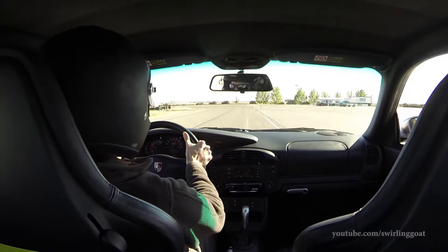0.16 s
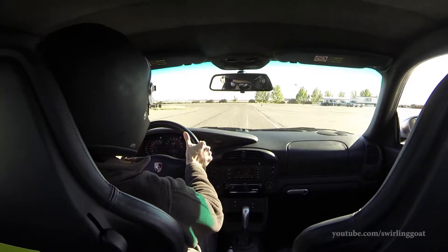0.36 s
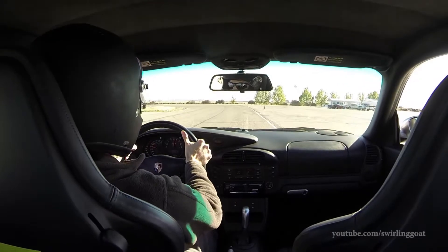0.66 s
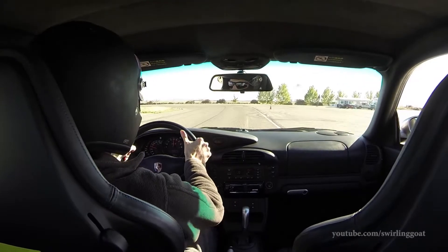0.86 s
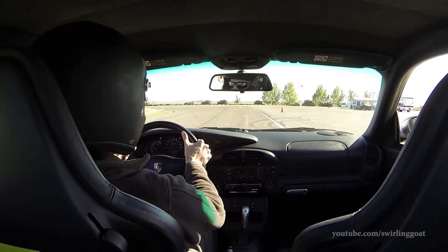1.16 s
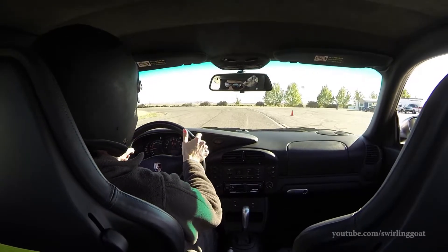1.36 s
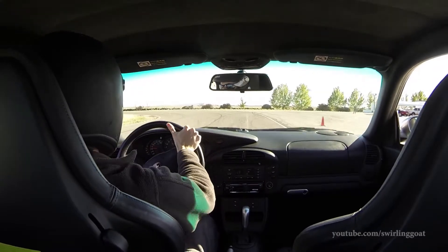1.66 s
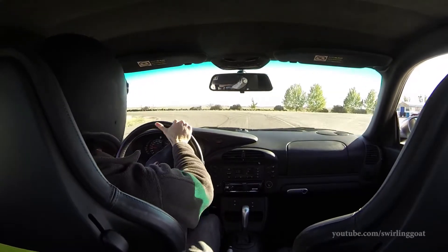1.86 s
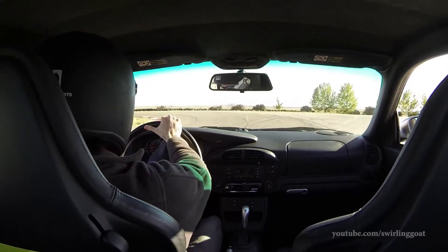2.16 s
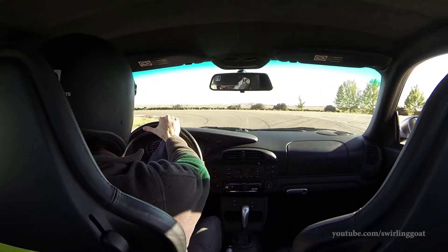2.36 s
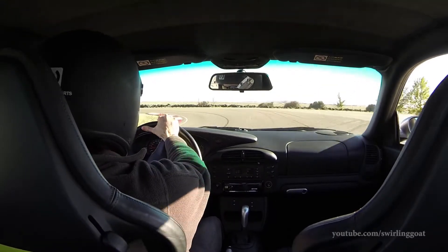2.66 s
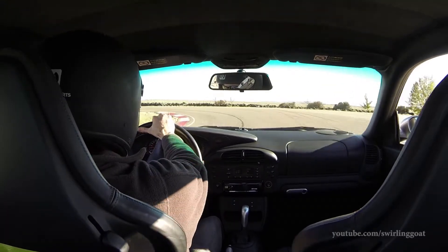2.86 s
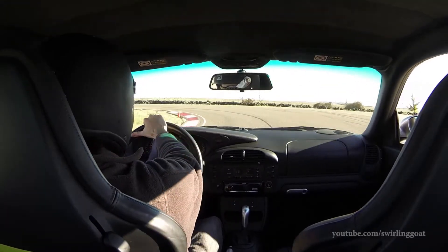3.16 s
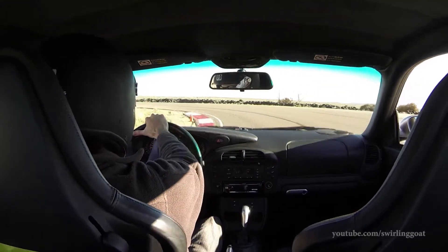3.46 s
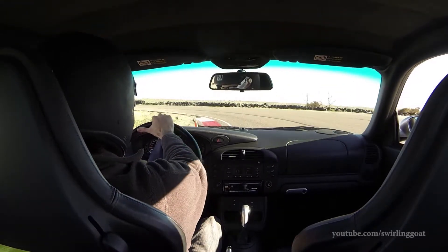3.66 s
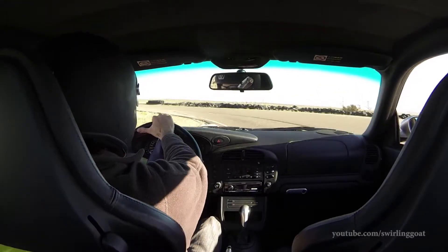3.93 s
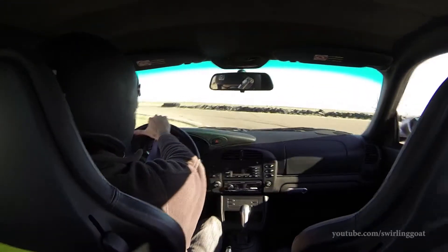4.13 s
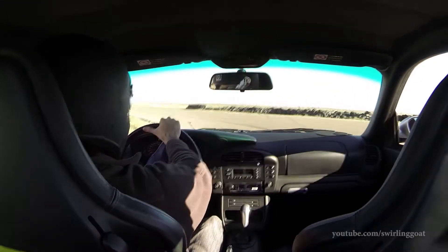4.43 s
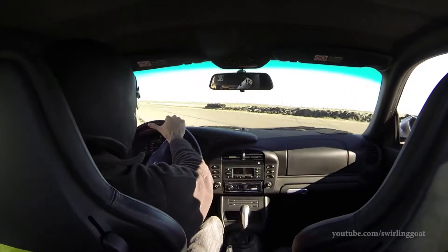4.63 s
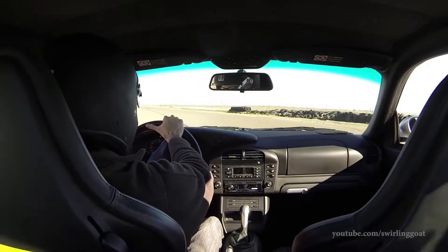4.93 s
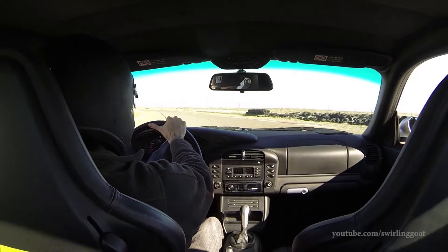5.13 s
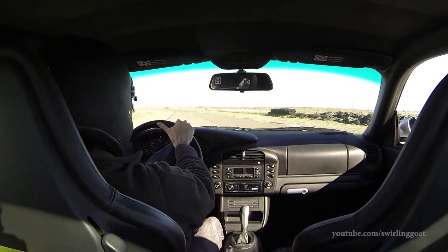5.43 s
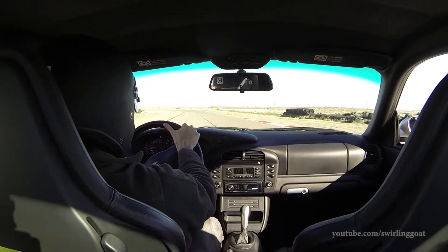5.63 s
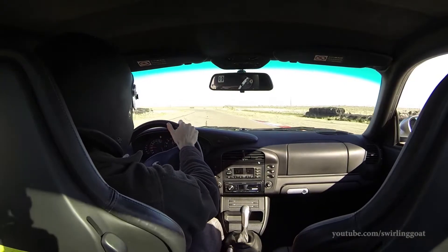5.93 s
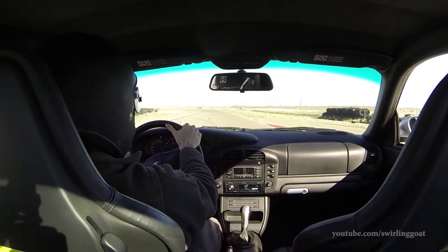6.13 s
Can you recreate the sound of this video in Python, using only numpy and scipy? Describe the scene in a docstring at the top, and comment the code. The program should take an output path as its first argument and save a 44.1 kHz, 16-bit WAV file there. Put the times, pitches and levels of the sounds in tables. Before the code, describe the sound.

A sports car engine heard from inside slows, holds through a corner, then pulls hard over road rumble and microphone crackle.

```python
"""Inside a car, a six-cylinder engine slows under braking, holds through a corner, then pulls hard.
Its tones swell as they cross pitches at which the cabin rings. Under it the road rumbles, the wind
roars and the tyres scrub. Bumps make the cabin boom, ridges jolt the floor and loose trim clinks.
A small overloaded microphone crackles, the level dips after loud crackles, and the deep bass is cut."""
import sys
import numpy as np
from scipy import signal
from scipy.fft import rfft, irfft, next_fast_len
from scipy.io import wavfile
from scipy.ndimage import uniform_filter1d, map_coordinates

SR = 44100
rng = np.random.default_rng(int(sys.argv[2]) if len(sys.argv) > 2 else 0)


def generate_wav(sig):
    """Save sig (samples, or channels by samples) to the path in sys.argv[1] as 16-bit PCM at SR."""
    pcm = np.round(np.clip(np.atleast_2d(sig).T, -1, 1) * 32767).astype(np.int16)
    wavfile.write(sys.argv[1], SR, pcm)


N = 277389
STEP = 64  # samples between the points of a slow curve
SLOW_S = np.arange(0, N + STEP, STEP) / SR


def amp(db):
    """Turn decibels into a gain."""
    return 10 ** (np.asarray(db) / 20)


def unit(x):
    """Scale x to an average (rms) level of 1."""
    return x / np.sqrt(np.mean(x ** 2) + 1e-20)


def curves(rows):
    """One slow curve for each column after the time."""
    times, *columns = np.transpose(rows)
    return [np.interp(SLOW_S, times, column) for column in columns]


def wobble(rate):
    """A slow curve gliding through `rate` random values a second."""
    return map_coordinates(rng.standard_normal(int(N * rate / SR) + 4), [SLOW_S * rate])


def smooth(x):
    """Fill in a slow curve to one value a sample."""
    return np.interp(np.arange(N) / STEP, np.arange(len(x)), x)


def filtered(x, response):
    """Scale each frequency in x by response(hz)."""
    size = next_fast_len(N + SR // 2)
    return irfft(rfft(x, size) * response(np.fft.rfftfreq(size, 1 / SR)), size)[..., :N]


def noise(spectrum):
    """Noise of level 1, shaped by rows of pitch_hz, level_db."""
    pitches, levels = np.transpose(spectrum)
    gain = lambda hz: amp(np.interp(np.log(hz + 1), np.log(pitches + 1), levels))
    return unit(filtered(rng.standard_normal(N), gain))


# When the tyres scrub: middle_s, length_s, level_db
SCRUBS = [(.8, 1.101, -46)]
# The tone of the scrub: pitch_hz, level_db
SCRUB_TONE = [(800, -120), (960, -7.5), (1060, 3), (1130, -7.5), (1200, -4.5), (1300, -11.5), (1500, -120)]

def tyre_scrub():
    """Tyres make a narrow, fluttering hiss while the brakes bite."""
    swell = sum(amp(db) * np.exp(-(2 * (SLOW_S - s) / length) ** 2) for s, length, db in SCRUBS)
    return smooth(swell * amp(2.5 * wobble(11))) * noise(SCRUB_TONE)


# Low hums: middle_s, length_s, pitch_hz, fall_hz_per_s, level_db
HUMS = [(1.68, 0.5, 180.5, 32, -28.5), (4.48, 0.56, 140.7, 15, -28.5)]

def hum():
    """Wavering tones from the tyres or drive line swell and sink in pitch."""
    sound = np.zeros(N)
    for s, length, hz, fall, db in HUMS:
        t = np.arange(N) / SR - s
        swell = amp(db) * np.exp(-(2 * t / length) ** 4)
        sound += swell * np.sin(2 * np.pi * (hz - fall * t / 2) * t)
    return sound * np.sqrt(2) * smooth(amp(1.3 * wobble(6.6)))


# Knocks on loose trim: start_s, level_db, pitch_hz
CLINKS = [(.227, -47, 5000), (.326, -43.5, 4800), (1.304, -40, 2230), (2.139, -34, 3410),
          (2.748, -44, 2330), (3.198, -40, 2348), (3.535, -49, 2200), (3.64, -48, 2300), (4.428, -35, 2500),
          (4.55, -42, 2070), (4.73, -35, 2210)]

def trim_clinks(ring_s=0.016):
    """Each knock makes the plastic trim ring briefly at one pitch."""
    sound, t = np.zeros(N + SR), np.arange(SR // 20) / SR
    attack = 1 - np.exp(-t / 0.00097)
    for s, db, hz in CLINKS:
        sound[round(s * SR):][:len(t)] += amp(db - 60 * t / ring_s) * attack * np.sin(2 * np.pi * hz * t)
    return sound[:N]


# How strong the faint ticks are: time_s, level_db
TICK_LEVELS = [(0, 3.5), (3.3, -0.5), (3.5, -1.5), (4.6, 5.5), (4.8, 0.5), (6.29, -12.5)]

def faint_ticks(level_db, spread_db, count, width):
    """The loudness outline of random ticks, each `width` samples long, swelling in clumps."""
    ticks = np.zeros(N)
    when, strength = rng.random((count, 2)).T
    np.add.at(ticks, (when * N).astype(int), amp(level_db + spread_db * strength ** 2))
    clumps = smooth(amp(curves(TICK_LEVELS)[0] + 3 * wobble(9)))
    return np.convolve(ticks * clumps, np.hanning(width), "same")


def ringing(x, depth_db):
    """Lift and sink narrow bands at random, so each crackle has its own pitches."""
    bands = signal.stft(x, nperseg=256)[2]
    lift = uniform_filter1d(rng.standard_normal(bands.shape), size=3, axis=0)
    lift = uniform_filter1d(lift, size=4, axis=1)
    return unit(signal.istft(bands * amp(depth_db * unit(lift)), nperseg=256)[1][:N])


# Microphone overloads: middle_s, level_db, extra_dull_db, length_s
CRACKLES = [(0.013, -40, 11, 0.0041), (0.052, -54, 18, 0.0015), (0.077, -53, 9, 0.0026),
            (0.12, -55, 6, 0.0012), (0.359, -54, -3, .0015), (0.088, -59, -15, 0.036),
            (0.229, -40.5, 8.5, 0.0018), (0.2366, -43, -3, 0.0014), (0.327, -41.5, 5, 0.0041),
            (0.3366, -53, 6.5, 0.0064), (0.379, -48, 1, 0.0056), (.4266, -51, -12, 0.0017),
            (0.467, -43, -4, 0.0011), (0.498, -40.5, -5, 0.00086), (0.539, -53.5, -5, 0.0012),
            (0.634, -42, 4, 0.0063), (0.7286, -43, 5, 0.0019), (0.737, -52, 9, 0.0038),
            (0.924, -47.5, -2, 0.0022), (1.006, -43.5, 8, 0.0057), (1.1474, -43.5, 3, 0.0028),
            (1.156, -47, -4, 0.0036), (1.091, -51, 4, .0015), (1.189, -55, 5.5, 0.0013),
            (1.3074, -39.5, -1, 0.0054), (1.342, -51, -2, 0.0012), (1.522, -51, -4.5, .0015),
            (1.553, -50, -4, 0.0018), (1.636, -46.5, 0, .002), (1.859, -49, 3, 0.0011),
            (1.4936, -40.5, -7, 0.0022), (1.651, -45.5, 13.5, 0.0063), (1.66, -50.5, -5, 0.0024),
            (1.736, -39, 1.5, 0.0041), (1.804, -43, -6, 0.0018), (1.872, -45.5, 11.5, 0.0045),
            (1.997, -49, -5, 0.0027), (2.1422, -39.5, 6, 0.0017), (2.148, -52.5, 12, 0.0061),
            (2.338, -51.5, 7, 0.0045), (2.475, -49, -5.5, 0.002), (2.499, -51, 4, .0015),
            (2.81, -49, 1, .0015), (3.006, -51, -2, .0015), (3.441, -47.5, -1, .0015),
            (2.418, -44.5, 11, 0.0025), (2.479, -40.5, 10, 0.0015), (2.6435, -42, 9.5, 0.0015),
            (2.7496, -40, 5, 0.0037), (2.912, -47.5, 15, .0035), (2.9375, -45, -9, .0012),
            (2.961, -46, -17, 0.002), (2.966, -46.5, 4, 0.0017), (3.199, -37, -2, .0035),
            (3.206, -42, 7, 0.0043), (3.3645, -45.5, -13, 0.0015), (3.478, -50.5, -1, 0.0077),
            (3.5306, -43.5, 7, 0.0064), (3.5384, -37.5, 1, 0.0041), (3.546, -48.5, 14, 0.0025),
            (3.635, -47, 8, 0.005), (3.6448, -38, 0, 0.0024), (3.8097, -42, -4, 0.0032),
            (3.816, -43.5, 13, 0.0033), (3.904, -51, 18.5, 0.0047), (3.9112, -42, 14, 0.0012),
            (3.949, -48, 6, 0.0013), (3.9596, -48, 12, 0.0055), (4.07, -48.5, 18.5, 0.0019),
            (4.0912, -42, 0, 0.003), (4.099, -48.5, 7, 0.0049), (4.147, -44.5, 15.5, 0.0029),
            (4.152, -49, -6, .002), (4.221, -39, 12, 0.0011), (4.31, -68, 31.5, 0.0038),
            (4.3475, -57, 16, 0.012), (4.171, -57, 5, .0015), (4.375, -54, 3, 0.00099),
            (4.393, -43, 11, 0.0018), (4.461, -60, 5, 0.0014), (4.431, -48.5, 6, 0.011),
            (4.437, -58, -1, 0.0033), (4.486, -56, 19, 0.0035), (4.502, -49.5, 15.5, 0.0019),
            (4.5517, -51, 14.5, 0.006), (4.625, -49, 12, 0.004), (4.631, -46, -21, 0.0018),
            (4.791, -47.5, -0.5, 0.00148), (4.909, -46.5, -1, 0.0025), (4.815, -54, -3, .0013),
            (4.882, -54.5, -2, 0.0015), (4.993, -45.5, -3, 0.0023), (5.17, -47, -2.5, 0.0016),
            (5.211, -44, 8, 0.0019), (5.223, -39, 1, 0.0039), (5.313, -54, 7, .002),
            (5.323, -49, -2, 0.0043), (5.342, -57, -5, .0013), (5.398, -49.5, 0, 0.0047),
            (5.468, -46, -6, 0.00323), (5.491, -57, -7, .0013), (5.592, -49, -8.5, 0.002),
            (5.677, -57, -9, 0.0033), (5.6823, -42, 9, 0.0021), (5.715, -43, -7.5, 0.00076),
            (5.733, -50.5, -0.5, 0.0023), (5.742, -52.5, -2, .0013), (6.018, -47.5, -13, .003),
            (6.0273, -46, 3, 0.0095), (6.046, -47, -10, 0.0045), (6.0925, -47, -3, 0.0018),
            (6.146, -50, -12, 0.0074), (6.271, -42, -5, 0.0016)]
# The sharp, dull and thin parts of a crackle: pitch_hz, level_db
SHARP_TONE = [(1200, -63.5), (2200, 8), (3000, 1), (4000, -2), (5000, -4), (6500, -10), (8000, -13.5),
              (10000, -20), (12000, -24.5), (14000, -45.5), (15500, -41.5)]
DULL_TONE = [(300, -120), (500, -0.5), (1200, 3.5), (2000, -2.5), (3000, -18), (5000, -120)]
THIN_TONE = [(3500, -120), (5500, -7.5), (8000, -4), (11000, -5.5), (15000, -21)]

def microphone_crackles():
    """Each overload is a short burst of grit with three tiny ticks close by."""
    sharp, dull, thin = np.zeros((3, N + SR))
    t = np.arange(-SR // 40, SR // 40) / SR
    for s, db, dull_db, length in CRACKLES:
        thin_db = -31 + 13 * rng.random()
        burst = np.exp(-(2 * t / length) ** 4)
        ticks = sum(amp(-8 - 10 * softness) * np.exp(-((t - .04 * (when - .5)) / 0.00072) ** 2)
                    for when, softness in rng.random((3, 2)))
        start = round((s + t[0]) * SR)
        parts = (sharp, -2, burst + ticks), (dull, dull_db - 3.5, burst), (thin, thin_db, burst)
        for track, offset_db, shape in parts:
            shape = shape[max(-start, 0):]  # skip anything before time zero
            track[max(start, 0):][:len(shape)] += amp(db + offset_db) * shape
    sharp = sharp[:N] + faint_ticks(level_db=-67, spread_db=11.5, count=1000, width=61)
    dull = dull[:N] + faint_ticks(level_db=-53, spread_db=7.5, count=400, width=131)
    thin = thin[:N] + faint_ticks(level_db=-75.5, spread_db=10.5, count=300, width=41)
    grit = ringing(noise(SHARP_TONE), depth_db=2.5)
    return sharp * grit + dull * noise(DULL_TONE) + thin * noise(THIN_TONE)


# Sudden drops in level: start_s, depth_db, recovery_s
DIPS = [(.39, -4, 0.038), (1.5, -4, 0.05), (1.885, -4.5, 0.031), (2.15, -3.5, 0.07), (2.49, -2.5, 0.059),
        (2.99, -3.5, 0.062), (3.215, -5.5, 0.046), (3.55, -2, 0.13), (3.97, -9.5, 0.052),
        (4.23, -7.5, 0.077), (4.64, -3, 0.11), (4.81, -2.5, 0.022), (5.23, -2, 0.037), (6.035, -6.5, 0.02)]

def level_dips(loud_db=-52):
    """A gain that drops after each loud crackle and at the listed times, then creeps back."""
    def dip(start_s, depth_db, recovery_s):
        age = np.clip(SLOW_S - start_s, 0, None)
        return depth_db * (1 - np.exp(-age / 0.00061)) * np.exp(-age / recovery_s)

    after_crackles = [dip(s, -0.4 * max(db - loud_db, 0), 0.14) for s, db, _, _ in CRACKLES]
    return smooth(amp(np.min(after_crackles, axis=0) + sum(dip(*row) for row in DIPS)))


# The wheels cross ridges: start_s, level_db
RIDGES = [(3.529, -14.5), (3.63, -16.5), (3.795, -15), (3.946, -17), (4.084, -6), (4.134, -18),
          (4.213, -13), (4.343, -10), (4.391, -34), (4.424, -11.5), (4.469, -12), (4.543, -15),
          (4.619, -15.5), (4.816, -22.5)]

def ridge_jolts(pitch_hz=201.4):
    """Each ridge gives the floor one quick pull and push."""
    floor, turns = np.zeros(N + SR), np.arange(SR // 20) / SR * pitch_hz
    jolt = amp(-12.3 * turns) * np.sin(2 * np.pi * turns) * (1 - np.exp(-3 * turns))
    for s, db in RIDGES:
        floor[round(s * SR):][:len(jolt)] -= amp(db) * jolt
    return floor[:N]


# Bumps in the road: middle_s, level_db, length_s, pitch_hz
BUMPS = [(0.231, -16.5, 0.019, 125.5), (0.31, -16, 0.058, 113.3), (0.376, -12.5, 0.015, 127.7),
         (0.573, -11.5, 0.024, 116.3), (0.644, -10, 0.017, 119), (0.98, -14, 0.045, 114.1),
         (1.957, -15.5, 0.03, 112), (2.114, -15.5, 0.056, 121.2), (2.328, -12.5, 0.036, 113),
         (2.418, -14, 0.024, 111), (2.468, -14, 0.061, 119), (2.748, -17.5, 0.026, 123.2),
         (2.83, -14.5, 0.031, 112), (2.936, -15.5, 0.019, 111.3), (3.196, -11, 0.068, 107.1),
         (3.361, -17, 0.035, 118.6), (3.484, -13, 0.071, 121.7), (3.598, -13.5, 0.033, 110.7),
         (3.758, -18, 0.056, 116.3), (3.825, -13.5, 0.035, 111), (3.871, -10, 0.026, 114),
         (3.946, -9.5, 0.02, 113.3), (4.056, -16, 0.092, 104.9), (4.235, -10.5, 0.025, 116),
         (4.434, -12.5, 0.021, 119), (4.783, -12.5, 0.07, 111.1), (4.878, -12, 0.046, 110)]

def cabin_booms():
    """Bumps make the cabin boom; returns the sound and its slow loudness curve."""
    swell = sum(amp(db) * np.exp(-(2.18 * (SLOW_S - s) / length) ** 2) for s, db, length, _ in BUMPS)
    times, _, _, pitches = np.transpose(BUMPS)
    nearest = np.abs(SLOW_S[:, None] - times).argmin(axis=1)
    phase = 2 * np.pi * np.cumsum(smooth(pitches[nearest])) / SR
    return smooth(swell) * np.sin(phase + smooth(0.75 * wobble(4.5))), swell


# Where the trim panels ring: pitch_hz, width_hz, boost_db
PANELS = [(1890, 67, 3.5), (2150, 37, 4), (2670, 130, 4), (3660, 82, 10)]

def panel_gain(hz):
    """Panels boost sound near their own pitches."""
    return amp(sum(db / (1 + (2 * (hz - pitch) / width) ** 2) for pitch, width, db in PANELS))


# Road and wind levels: time_s, thud_db, rumble_db, roar_db
ROAD_LEVELS = [(0, -18.5, -25, -46), (.3, -37.5, -26.5, -40.5), (.8, -19, -25.5, -41),
               (1.3, -19, -25.5, -43.5), (1.7, -23.5, -28.5, -43.5), (2.1, -34.5, -27.5, -46),
               (2.5, -25, -27.5, -45.5), (3, -23.5, -28.5, -46), (3.5, -42, -28.5, -46),
               (3.7, -30, -31, -49), (4.1, -35, -28.5, -47.5), (4.5, -25, -25.5, -46.5),
               (4.7, -33, -27, -48), (4.87, -26.5, -27.5, -43.5), (5.17, -27.5, -24, -40),
               (5.8, -23, -27, -40), (6, -18.5, -26, -38.5), (6.29, -26.5, -30, -37.5)]
# The tones of the thud, rumble and roar: pitch_hz, level_db
THUD_TONE = [(80, -27), (92, 5), (105, 28.5), (125, 15), (150, 2), (190, -48.5), (300, -120)]
RUMBLE_TONE = [(76, -6.5), (130, -4), (146, -15), (178, -0.5), (205, -14), (253, -4.5), (300, -6.5),
               (335, -23.5), (371, -13), (408, -22), (487, -15), (535, -27), (750, -39.5), (980, -39),
               (1650, -120)]
ROAR_TONE = [(300, -120), (450, -2), (560, 1), (680, -1), (800, 0), (1050, -0.5), (1200, 1), (1410, -8),
             (1600, -1.5), (1760, -8.5), (2200, -11.5), (3050, -26), (3700, -31), (4200, -34),
             (6500, -44.5), (10000, -51.5), (14000, -79)]

def road_and_wind(engine_angle):
    """Tyres thud and rumble through the floor; wind and intake roar pulse with the engine."""
    thud_db, rumble_db, roar_db = curves(ROAD_LEVELS)
    roughness = wobble(24)
    boom, swell = cabin_booms()
    shaken = np.tanh(swell / amp(-18))  # nears 1 on a strong bump
    rattle = sum(np.exp(-((SLOW_S - s - .006) / 0.0089) ** 2) * (2 + db / 45) for s, db in RIDGES)
    thud = smooth(amp(thud_db - 3.5 + roughness)) * noise(THUD_TONE)
    rumble_db += 1.7 * shaken + 1.74 * roughness + 2.3 * wobble(50)
    rumble = smooth(amp(rumble_db)) * noise(RUMBLE_TONE)
    roar_db += 1.1 * shaken + 2.5 * rattle + 1.6 * roughness + 1.1 * wobble(70)
    pulse = 1 + 0.11 * np.sin(engine_angle) + 0.33 * np.sin(3 * engine_angle)
    roar = smooth(amp(roar_db)) * unit(pulse * filtered(noise(ROAR_TONE), panel_gain))
    return boom + thud + rumble + roar


# Where the cabin rings: pitch_hz, width_hz, level_db
CABIN_PEAKS = [(107.3, 6.63, 7.5), (126.34, 6, 5), (164, 6.5, -3.5), (252.94, 16, -1), (301.5, 15, 0.5),
               (381, 11, 5.5), (435, 11, 1), (490, 19, 1), (517, 14, -6.5), (541, 8.6, -10),
               (610, 12, -10.5), (612, 17, -8), (673.3, 13, -1.5), (737, 24, -7), (932, 36, -2),
               (1060, 45, -1), (1198, 19, 3.5), (1338, 21, -5), (1586, 47, -1.5), (1880, 22, -11.5)]

def cabin_gain(hz, base_db=-15):
    """How strongly the cabin answers a steady tone."""
    peaks = sum(amp(2 * db) / (1 + (2 * (hz - pitch) / width) ** 2) for pitch, width, db in CABIN_PEAKS)
    return np.sqrt(amp(2 * base_db) + peaks)


# Engine speed (every cylinder fires once a cycle): time_s, cycles_per_s
ENGINE_SPEED = [(0, 47.8), (.28, 46.2), (.48, 43.7), (.56, 42.2), (.72, 41.2), (.78, 40.2), (.9, 38.7),
                (1.13, 37), (1.2, 36.3), (1.35, 34.5), (1.56, 33.2), (1.7, 32.6), (1.95, 31.8),
                (2.24, 31.3), (2.45, 31.4), (2.6, 32), (2.69, 31.6), (3.14, 32.25), (3.3, 32.2),
                (3.47, 32.4), (3.59, 32.8), (4.19, 33.8), (4.94, 34.6), (5.39, 35.7), (5.84, 36.9),
                (6.29, 38.5)]
# How hard the engine works: time_s, throttle_db, load_db, whine_db
EFFORT = [(0, -34.5, -25, -49.5), (.4, -26, -4.5, -67), (.6, -35, -10, -53), (.85, -10, -5.5, -55.5),
          (1.08, -26, -11.5, -61.5), (1.22, -16, 2.5, -55.5), (1.4, -18, 4.5, -56), (1.62, -7, 4.5, -51),
          (1.9, -13.5, -4, -56.5), (2.3, -15, -4, -58.5), (2.55, -22.5, -11.5, -60),
          (2.62, -11, -13.5, -56.5), (2.9, -9, -10.5, -57.5), (3.2, -6.5, -12, -59),
          (3.3, -13.5, -7.5, -56), (3.52, -5, -4, -58), (3.62, -17.5, -7, -65.5), (4.2, -12.5, -9, -54.5),
          (4.72, -28, -15.5, -75.5), (4.9, -15, -1, -52.5), (5.0, -9.5, 1, -53.5), (5.1, 0, 0.5, -49.5),
          (5.6, -0.5, -4, -54.5), (5.95, 2, 0, -47.5), (6.07, 1, 1.5, -46), (6.29, 2.5, 2.5, -51)]
# Base levels of the low, middle and upper tones: shake_db, drone_db, snarl_db
BASE_LEVELS = [-35, -34.5, -43.5]
# Tones from uneven cylinders and pipes: multiple_of_cycle, level_db
ENGINE_TONES = [(3, 13.5), (4, 11), (5, 2.5), (6, 9.5), (7, -5.5), (8, 6.5), (9, 3), (10, 10.5), (11, -2.5),
                (12, 16), (13, 6.5), (14, 11), (15, 12.5), (16, 2.5), (17, 4.5), (18, 11), (19, -8),
                (20, 2), (21, -3.5), (22, -0.5), (23, -4.5), (24, 4), (25, -2.5), (26, 1.5), (27, 0),
                (28, -0.5), (29, -7), (30, 2.5), (31, -7), (32, -9.5), (33, -0.5), (34, -4.5), (35, -5),
                (36, 2.5), (38, 1.5), (39, -5), (40, 3), (41, -0.5), (42, 1.5), (43, -2), (44, 2),
                (45, -0.7), (46, 0.5), (47, -2), (48, 0), (49, -0.5), (50, 2), (52, 7), (54, 4.5)]
# Tones that sing off the throttle: multiple_of_cycle, level_db
COAST_TONES = [(24, 2), (27, -1), (28, 0), (30, 0.2), (33, -1.5), (36, -0.5), (39, -5.5), (42, -5),
               (48, -3)]
# How loud those coasting tones are: time_s, level_db
COAST_LEVELS = [(0, -59), (.3, -44.5), (.5, -59), (.65, -45), (.8, -46.5), (1, -51), (1.13, -48),
                (1.3, -57.5), (1.55, -45.5), (1.8, -57.5), (2.2, -60), (3.6, -70), (3.8, -51.5),
                (4.1, -65.5), (6.29, -83.5)]

def engine():
    """Firing cylinders make tones at multiples of the cycle; returns the sound and cycle angle."""
    cycle_hz, = curves(ENGINE_SPEED)
    coast_db, = curves(COAST_LEVELS)
    throttle_db, load_db, whine = curves(EFFORT)
    shake, drone, snarl = np.array([load_db, 0.53 * throttle_db, throttle_db]) + np.c_[BASE_LEVELS]
    angle = 2 * np.pi * np.cumsum(smooth(cycle_hz)) / SR

    def tone(multiple, level_db, drift_rad, drift_hz):
        size = np.sqrt(2) * amp(level_db) * cabin_gain(multiple * cycle_hz)
        phase = 2 * np.pi * rng.random() + drift_rad * wobble(drift_hz)
        return smooth(size) * np.sin(multiple * angle + smooth(phase))

    sound = np.zeros(N)
    # No two firings are alike, so level and timing waver.
    for multiple, db in ENGINE_TONES:
        drive_db = shake if multiple < 5 else drone if multiple < 10 else snarl if multiple <= 24 else whine
        sound += tone(multiple, drive_db + db + 2.16 * wobble(14), drift_rad=0.18, drift_hz=16)
    for multiple, db in COAST_TONES:
        sound += tone(multiple, coast_db + db + 3.9 * wobble(7), drift_rad=0.3, drift_hz=12)
    return sound, angle


def scene():
    """The driving sounds dip together; jolts, clinks and crackles sit on top."""
    motor, angle = engine()
    driving = motor + hum() + tyre_scrub() + road_and_wind(angle)
    return (driving * level_dips() + ridge_jolts() + trim_clinks() + microphone_crackles())[None]


def record(dry, low_cut_hz=92, top_hz=15800):
    """Round off the peaks, cut the deep bass, add a faint low noise and drop the highest treble."""
    rounded = dry / (1 + np.abs(dry / .55) ** 4) ** (1 / 4)
    cut = filtered(rounded, lambda hz: 1 / np.sqrt(1 + (low_cut_hz / (hz + 1)) ** 50))
    low_noise = amp(-67.5) * noise([(15, -11.5), (30, -6.5), (65, 2.0), (85, -8.0), (120, -120)])
    return filtered(cut + low_noise, lambda hz: hz < top_hz)


dry = scene()
out = record(dry)
generate_wav(out)
```